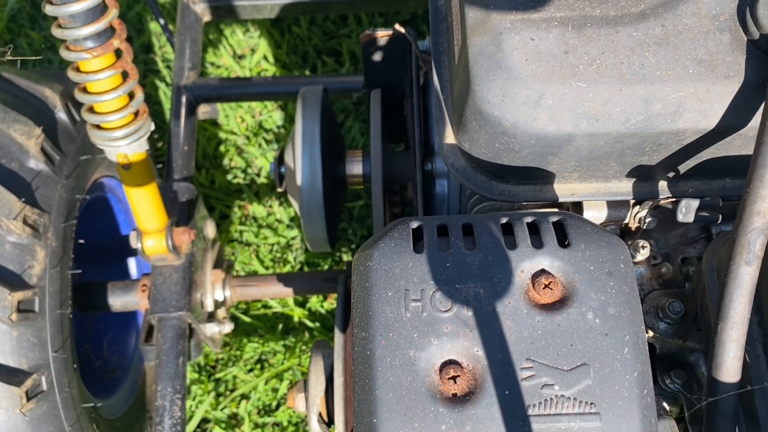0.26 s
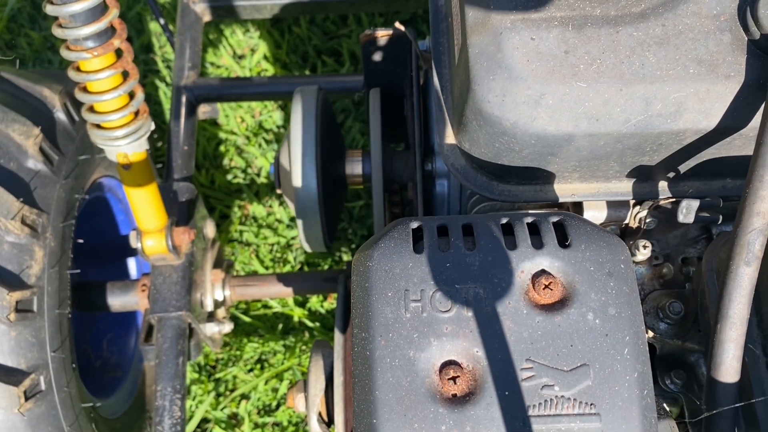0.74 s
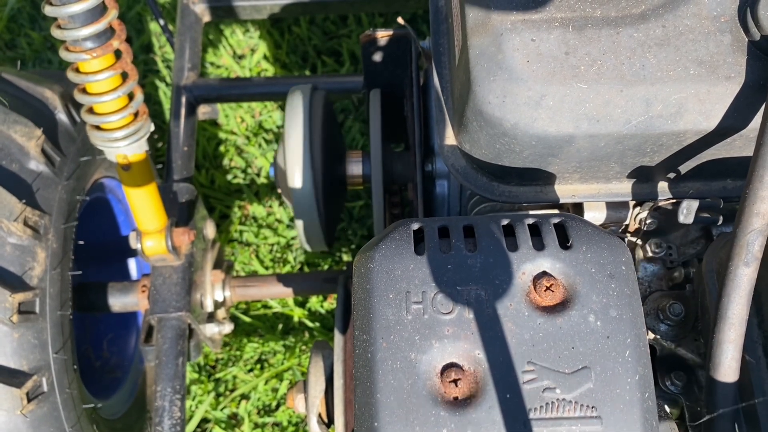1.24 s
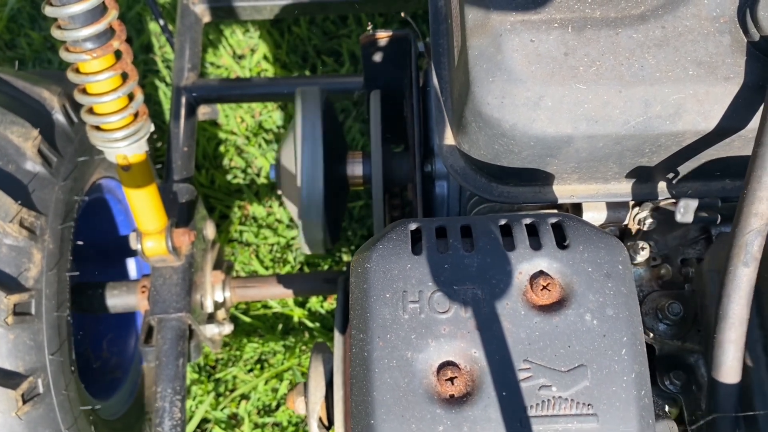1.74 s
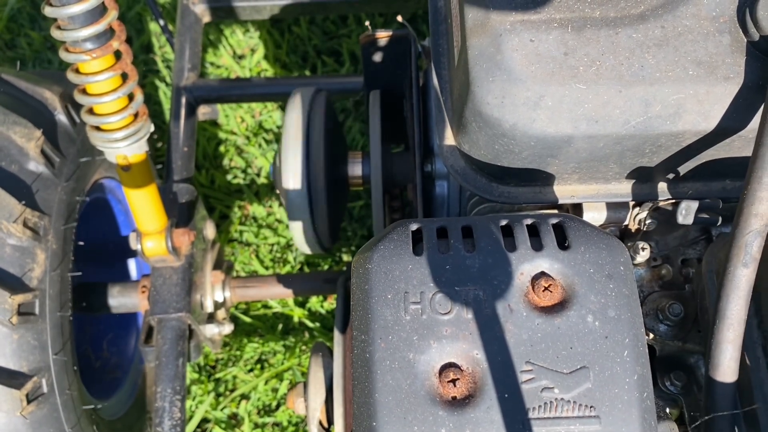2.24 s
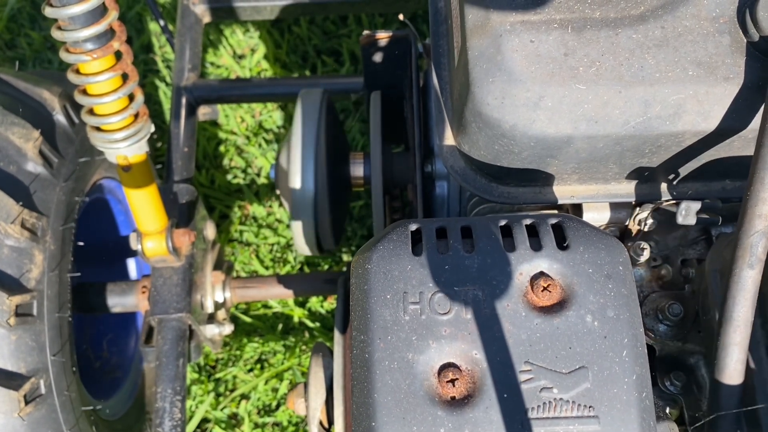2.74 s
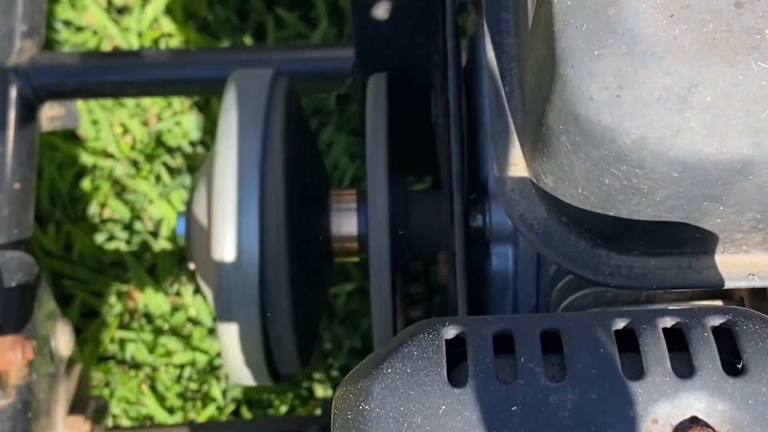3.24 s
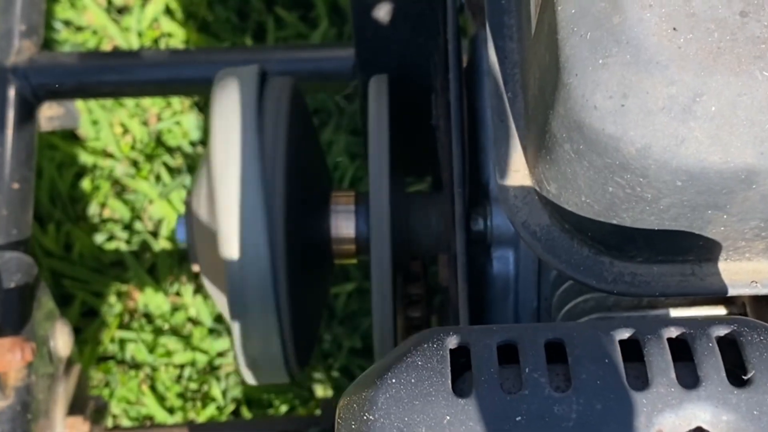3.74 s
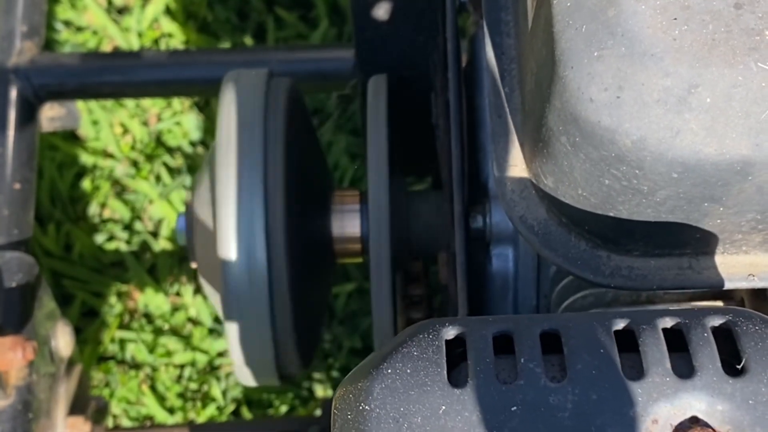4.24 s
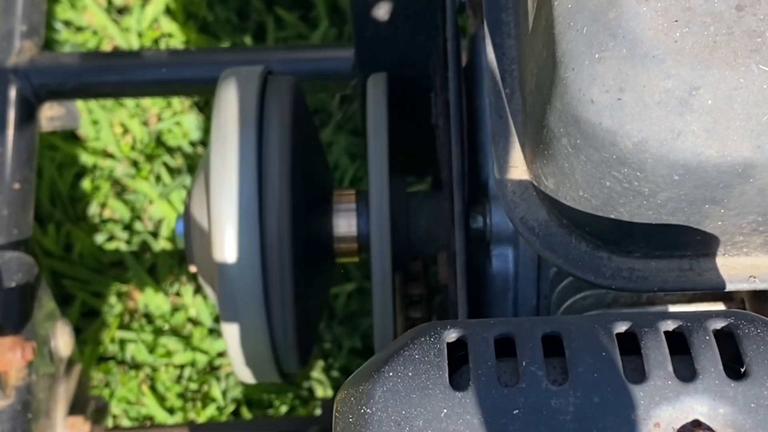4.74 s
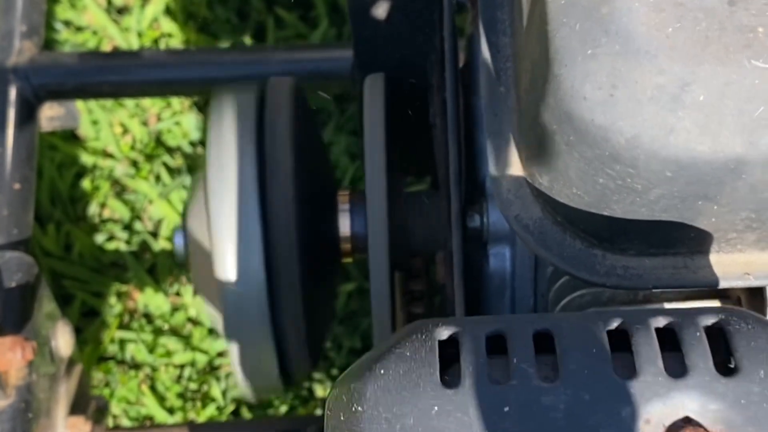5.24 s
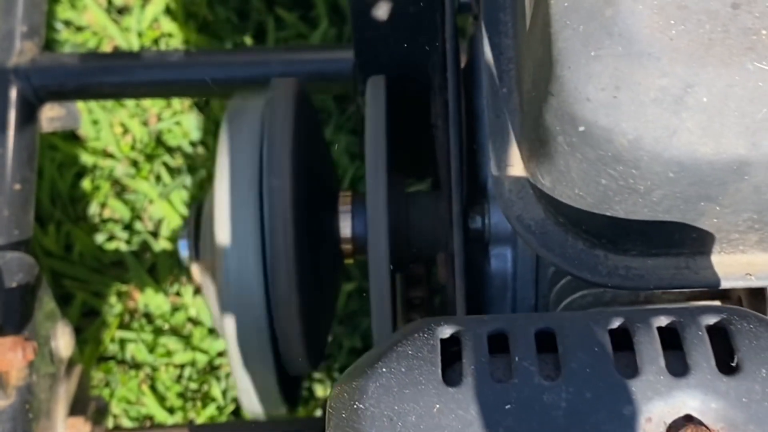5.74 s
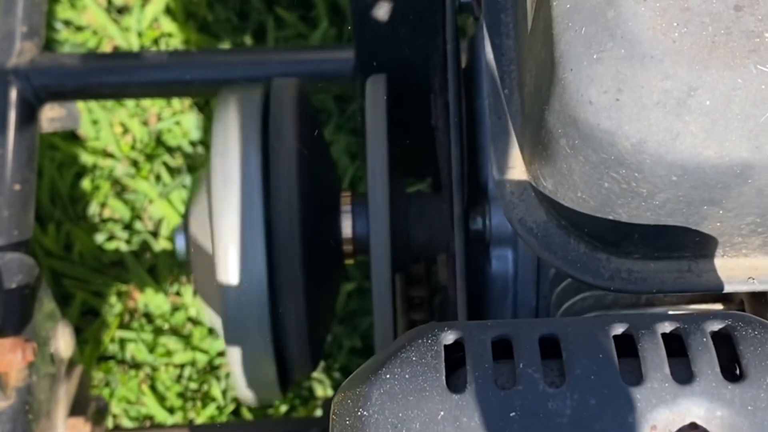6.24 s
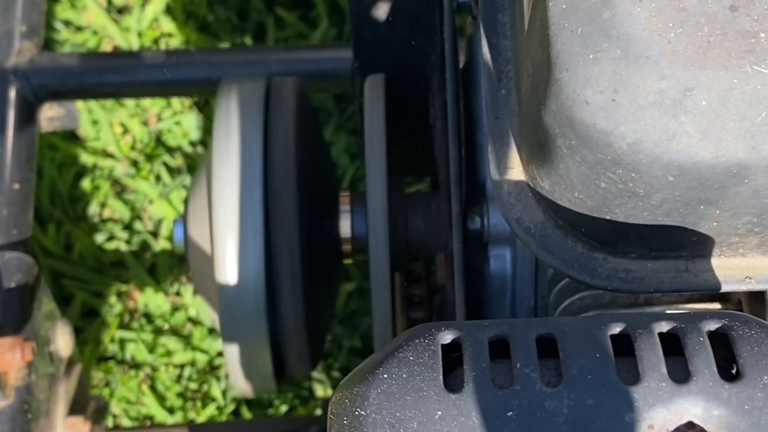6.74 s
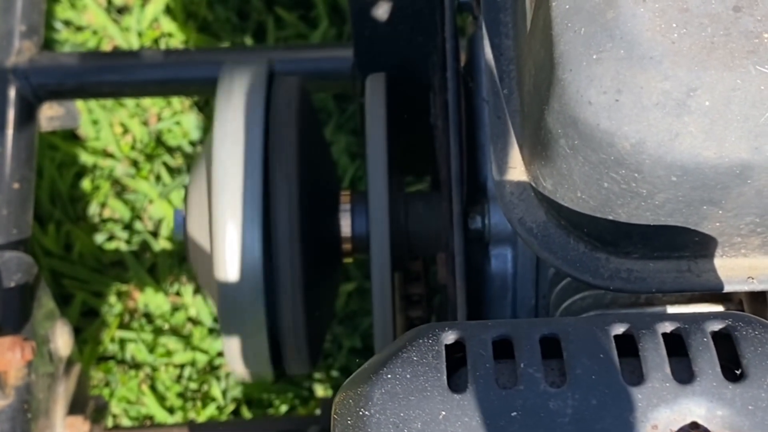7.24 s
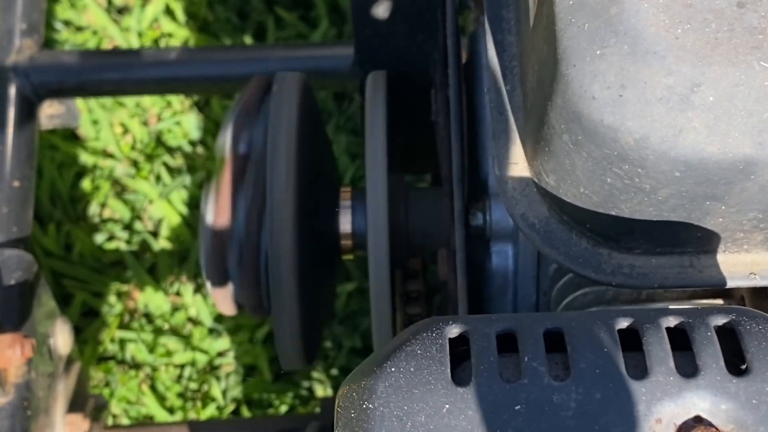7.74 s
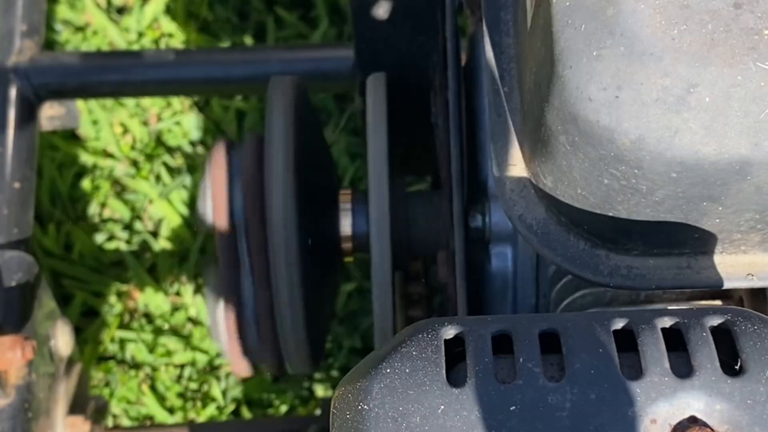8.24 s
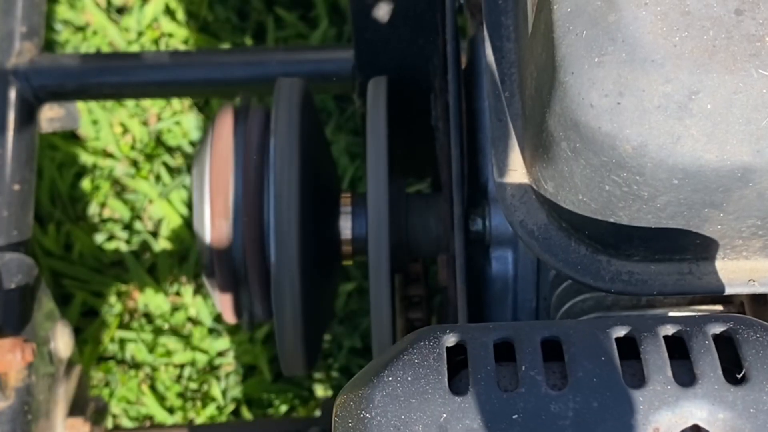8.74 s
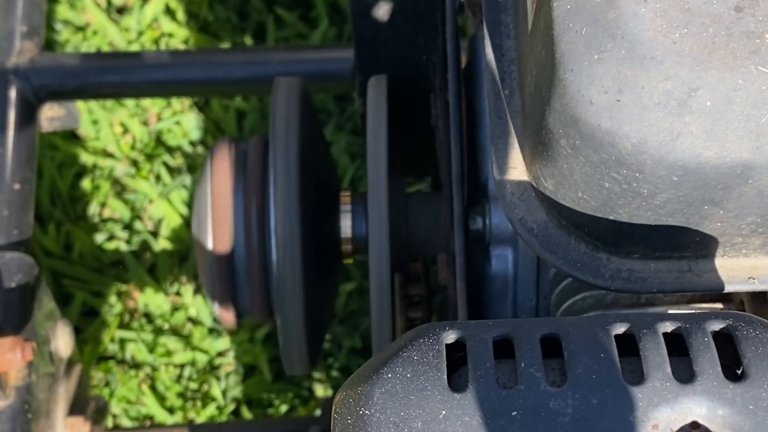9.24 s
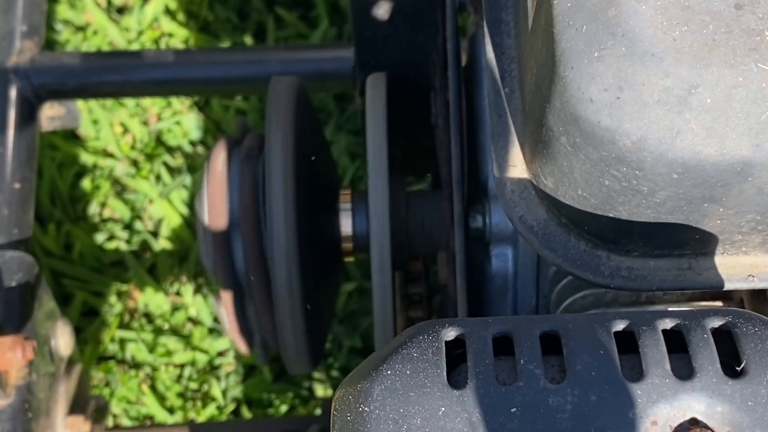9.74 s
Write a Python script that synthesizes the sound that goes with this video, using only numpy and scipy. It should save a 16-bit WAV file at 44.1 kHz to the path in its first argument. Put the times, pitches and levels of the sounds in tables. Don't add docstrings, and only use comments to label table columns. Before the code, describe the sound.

A small single-cylinder engine hunts at idle outdoors, puffing and rattling, surging in clusters of hard metallic slams from a loose clutch cup.

```python
import sys
import numpy as np
from scipy import signal
from scipy.fft import rfft, irfft, next_fast_len
from scipy.io import wavfile
from scipy.ndimage import uniform_filter1d

SR = 44100
rng = np.random.default_rng(int(sys.argv[2]) if len(sys.argv) > 2 else 0)


def invert_db(level):
    return 10 ** (np.asarray(level, dtype=float) / 20)


def wav_out(sig):
    wavfile.write(sys.argv[1], SR, np.round(np.clip(np.atleast_2d(sig).T, -1, 1) * 32767).astype(np.int16))


N = 440559

# t/s, speed/(turns/s), count/turns to next row
CRANK = [(.024, 18.7, 2), (.153, 14.2, 8), (.718, 17.9, 8), (1.176, 16.2, 4), (1.351, 25.7, 24),
         (2.523, 17.4, 4), (2.704, 25.4, 19), (3.622, 17., 4), (3.806, 24.8, 20), (4.774, 16.1, 6),
         (5.026, 29.2, 21), (5.917, 18.5, 10), (6.499, 16.06, 13), (7.35, 15.8, 4), (7.549, 24.2, 17),
         (8.393, 16.8, 8), (8.902, 14.9, 10), (9.575, 14.5, 8), (10.126, 14.5, 0)]
COAST_ABOVE_TPS, IDLE_BELOW_TPS, BREATHE_ABOVE_TPS, PULL_BELOW_TPS = 20.6, 16.4, 18.4, 24.5
SKIP_S, PUFF_LEAD_S, BURN_LEAD_S = 8.72, .012, .033

# f/Hz, level/dB
RUMBLE = [(40, -3), (100, 0), (160, -2.5), (230, -1.5), (360, -3.5), (480, -8), (900, -10.5), (1300, -88)]
# f/Hz, width/Hz, level/dB
SHIELD = [(784, 35, 1), (930, 79, 3.5), (1123, 105, 5), (1373, 550, -4), (1848, 21, 0.5), (2035, 80, -7),
          (2523, 230, -8.5)]
# f/Hz, level/dB
CLATTER = [(710, -29), (1200, -29), (1470, -3), (2010, 5.5), (2130, -12.5), (2480, -1), (4470, -5),
           (5810, -13), (6810, -10.5), (9000, -17), (11700, -55), (19800, -120)]
# f/Hz, width/Hz, level/dB
CLATTER_PEAKS = [(3970, 110, 11), (4870, 80, -58), (5960, 47, -4), (7040, 90, -31)]
# f/Hz, level/dB
FIZZ = [(6000, -9), (8000, -1.5), (9500, 4), (11000, 0.5), (13000, -1.5), (15700, -6.5), (16200, -57)]
# t/s, level/dB
SHAKE = [(0, 3), (.5, 2), (.62, 7), (.8, 0), (1.15, 4), (1.36, 1), (1.95, 0), (2.72, 3.5), (3.6, 1),
         (4.72, 2), (5.1, 3.5), (5.7, 2), (6.2, 2), (6.45, -3), (7.3, -1.5), (7.52, 3.5), (8.6, -4.5),
         (9.99, -4)]
# level at rest/dB, rise when flung/dB, share of shake/1
LAYERS = [
    (-33, 5, 1.2),
    (-32, 2.3, 0.92),
    (-38, 3, 1),
    (-49.5, 6.5, 1.08),
]
# t/s, length/s, level/dB
CHATTER = [
    (1.713, 0.22, -39.5),
    (2.994, 0.16, -36.5),
    (4.12, 0.137, -41),
]
# f/Hz, width/Hz, level/dB
WHIRL = [(1770, 30, -4), (2400, 69, -2), (3690, 39, 1.5), (4580, 96, -9), (4870, 34, -16), (5300, 94, -5.5),
         (6100, 60, -7), (6760, 75, -5), (7660, 65, -10)]
# f/Hz, width/Hz, level/dB
FRAME = [(237, 31, 0.5), (368, 55, 1), (459, 95, -2)]
WHIRL_DB, FRAME_DB = -32.5, -33
FLING_TPS, FLING_WIDTH_TPS = 20.8, 0.55
RUB_START_S, RUB_LENGTH_S, RUB_DB = 5.05, 0.75, 4

# t/s, length/s, f/Hz, width/Hz, level/dB
RINGS = [(.7, .06, 5185, 20, -27), (.7, .06, 6070, 40, -33), (.7, .06, 10600, 60, -34),
         (.7, .07, 14600, 60, -36), (.768, .02, 5060, 90, -19), (.768, .02, 10600, 150, -28),
         (.768, .02, 14600, 150, -30), (7.44, .05, 5185, 50, -25), (7.44, .17, 4960, 50, -29),
         (7.44, .27, 6060, 40, -30), (7.56, .05, 14600, 80, -34), (7.56, .07, 300, 30, -25),
         (7.56, .05, 500, 40, -27), (8.3, .04, 620, 60, -27), (7.62, .05, 3400, 30, -28),
         (7.62, .07, 5600, 50, -31), (7.62, .09, 7750, 40, -33), (7.62, .1, 7500, 40, -36)]
# t/s, level/dB
DRAG = [
    (5.95, -58),
    (6.02, -33.5),
    (6.08, -27),
    (6.24, -28.5),
    (6.3, -52),
    (6.4, -39),
]
DRAG_FIRST_S, DRAG_GAP_S, DRAG_COUNT = 5.993, .0255, 7

# t/s, shield ring level/dB, crash level/dB
BURNS = [(0.683, 6.5, -14), (0.743, 0, -21), (1.196, 6, -12.5), (1.247, -1, -15), (1.29, -5, -15.5),
         (1.33, -19, -25.5), (2.545, 2, -15.5), (2.593, 4, -17), (2.64, -3, -16), (3.644, 5.5, -15.5),
         (3.693, 5.5, -15), (3.741, 2, -16.5), (4.801, 4.5, -15), (4.847, 2, -15.5), (4.895, -1, -16),
         (4.934, -20, -16.5), (4.97, -21, -19.5), (5.028, -18, -18.5), (5.054, -4, -15.5),
         (7.382, 0, -18.5), (7.439, -16, -15), (7.481, -5, -19.5), (7.558, -6, -18.5), (7.621, -7, -23),
         (7.653, -24, -21.5)]
# t/s, crash level/dB
TAPS = [(.604, -33), (.633, -31), (.771, -30), (0.971, -24.5), (1.09, -27), (1.148, -26.5), (3.375, -38),
        (3.602, -30.5), (3.627, -35), (4.479, -35), (4.784, -25.5), (5.197, -28), (8.428, -32)]
# t/s, crash level/dB, shield ring level/dB
SLAPS = [
    (2.107, -24, -7),
    (3.474, -22.5, -3.5),
    (4.579, -22.5, -1.5),
    (6.274, -23, -33),
    (8.304, -28, -12),
]
# from t/s, to t/s, crash level/dB, shield ring level/dB
IDLE_KNOCKS = [
    (.1, .6, -27, 5),
    (8.75, 9.95, -34.5, -7),
]
# f/Hz, level/dB
CRASH = [(250, 4.5), (600, 6), (1500, -2), (3000, 0), (5000, -4.5), (7500, -7.5), (9000, -34), (10000, -60)]
# f/Hz, width/Hz, level/dB
RING = [(830, 40, -6), (945, 50, -4), (1148, 34, 0), (1380, 60, -10), (1830, 70, -10), (2410, 90, -16)]
BURN_SIZZLE_DB, TAP_SIZZLE_DB, SLAP_SIZZLE_DB, IDLE_SIZZLE_DB, TAP_RING_DB = -2, -4.5, 0.5, -2, 22
DRAG_CRASH_DB, DRAG_RING_DB, DRAG_SIZZLE_DB = 5, 20.5, -6
SWELL_S, RING_LEAD_S = .004, 0.00302
STRIKE = 12.3

# start/s, end f/Hz, sweep/Hz, sweep time/s, rise/s, length/s, size/1
INTAKE = [
    (-.0131, 84.6, 74., .0011, .021, .0211, .296),
    (.0022, 51.8, 845., .0041, .011, .0246, .148),
]
EXHAUST = [
    (-.0183, 80.8, 1036., .0031, .003, .04, .127),
    (-.0063, 124.8, 580., .0011, .0168, .0235, -.106),
]
COASTING = [
    (-.0165, 62.8, 193., .0042, .0007, .0298, .123),
    (-.012, 108.8, 390., .0012, .0024, .0149, .048),
]
# t/s, level/dB
PUFF_DB = [(0, -20), (0.72, -18.5), (0.82, -26), (1.05, -17), (1.36, -23.5), (1.85, -25), (2, -23),
           (2.6, -22.5), (3.55, -22.5), (4.85, -21), (5.15, -24), (5.7, -31.5), (6.3, -31), (7.3, -25),
           (7.6, -23.5), (7.9, -24.5), (8.4, -26), (9.99, -25.5)]
COAST_TPS, COAST_PITCH_POWER = 23, 0.65
SURGE_DB, SURGE_PITCH = 1, 1.12

# f/Hz, level/dB
SCATTER = [(50, -25), (250, -18), (500, -12), (1200, -11), (2500, -8.5), (5000, -11), (7500, -16),
           (16000, -17)]
# f/Hz, level/dB
BALANCE_DB = [(60, .8), (250, 1.5), (1000, 2.6), (2400, 3.7), (4400, 3.4), (8000, 0), (16000, 0)]
# f/Hz, phase/rad
LEAD = [(0, 0), (2000, .2), (3100, .5), (3600, .1), (6900, 0), (9050, -3.14), (11250, -6.28),
        (13150, -9.42), (15500, -12.57), (17000, -13)]
MID_DROP_DB, SIDE_DROP_DB, DROP_LUCK_DB, DROP_FROM_HZ = -6.5, -6, 2.2, 6200


def evened(x):
    return x / np.sqrt(np.mean(x ** 2) + 1e-20)


def read(points, hz):
    f, value = np.transpose(points)
    return np.interp(np.log(hz + 1), np.log(f + 1), value)


def curve(points, t, **ends):
    return np.interp(t, *np.transpose(points), **ends)


def colour(x, gain):
    size = next_fast_len(x.shape[-1])
    spectrum = rfft(x, size) * gain(np.fft.rfftfreq(size, 1 / SR))
    return irfft(spectrum, size)[..., :x.shape[-1]]


def white():
    return rng.standard_normal(N)


def noise(points):
    return evened(colour(white(), lambda hz: invert_db(read(points, hz))))


def resonate(x, modes):
    return sum((-1) ** k * invert_db(db) * signal.lfilter(*signal.iirpeak(hz, hz / width, SR), x)
               for k, (hz, width, db) in enumerate(modes))


def add(mix, s, sound):
    at = round(s * SR)
    part = mix[max(at, 0):max(at + len(sound), 0)]
    part += sound[max(-at, 0):][:len(part)]


def window(t, start, length, ramp_s):
    return np.clip(np.minimum(t - start, start + length - t) / ramp_s, 0, 1)


def crank():
    t = np.arange(N + 3000) / SR
    s, speed, count = np.transpose(CRANK)
    row = np.clip(np.searchsorted(s, t) - 1, 0, len(s) - 2)
    gain = ((count[:-1] / np.diff(s) - speed[:-1]) / np.diff(s))[row]
    u = t - s[row]
    angle = (np.cumsum(count) - count)[row] + speed[row] * u + gain * u ** 2
    return angle, speed[row] + 2 * gain * u, gain > 10


def turns():
    angle, speed, gaining = crank()
    at = np.searchsorted(angle, np.arange(int(angle[-1]) + 1) - 1e-4)
    s, speed, odd = at / SR, speed[at], np.arange(len(at)) % 2
    pulling = gaining[at - 1] & (speed < PULL_BELOW_TPS)
    slowing = np.where(odd, speed < BREATHE_ABOVE_TPS, 2)
    idling = odd == (s > SKIP_S)
    kind = np.select([pulling, speed > COAST_ABOVE_TPS, speed > IDLE_BELOW_TPS], [0, 2, slowing], idling)
    return s - PUFF_LEAD_S * (kind < 2), kind


def rattle():
    t, times = np.arange(N) / SR, turns()[0]
    angle, speed, _ = (v[:N] for v in crank())
    flung = uniform_filter1d(1 / (1 + np.exp((FLING_TPS - speed) / FLING_WIDTH_TPS)), size=1500)
    shake = curve(SHAKE, t)
    rumble, shield, clatter, fizz = (invert_db(db + more_db * flung + share * shake)
                                     for db, more_db, share in LAYERS)

    half_turns = 2 * angle + .3
    strength = rng.standard_normal(2 * len(times) + 4)[half_turns.astype(int)]
    tick = np.exp(-(half_turns % 1) / .4) * invert_db(1.6 * strength)

    def beat(depth):
        return evened(uniform_filter1d(1 - depth + depth * evened(tick), size=220))

    heave = evened(1 + (.6 - 0.37 * flung) * np.cos(2 * np.pi * (angle + 0.16)))
    bright = noise(CLATTER) + invert_db(-6.5) * resonate(white(), CLATTER_PEAKS)
    body = evened(resonate(white(), SHIELD))
    chatter = sum(invert_db(db) * window(t, s, length, 0.02) for s, length, db in CHATTER)
    rub = invert_db(RUB_DB * window(t, RUB_START_S, RUB_LENGTH_S, 0.014))
    clatter, fizz = rub * clatter, rub * fizz + chatter * tick ** 2

    whirl = invert_db(WHIRL_DB + shake - 4.5) * rub ** 1.3 * beat(0.58) * evened(resonate(white(), WHIRL))
    jolts = np.diff(np.floor(angle + .6), prepend=0) * invert_db(1.7 * strength)
    frame = invert_db(FRAME_DB + shake) * evened(resonate(jolts, FRAME))

    out = flung * (whirl + frame)
    out += invert_db(2.5) * rumble * heave * noise(RUMBLE)
    out += invert_db(-1.0) * shield * beat(0.063) * body
    out += invert_db(2.5) * clatter * beat(0.53 / rub) * evened(bright)
    return out + invert_db(7) * fizz * beat(0.76 / rub) * noise(FIZZ)


def cup():
    out, t = np.zeros(N), np.arange(16000) / SR
    for s, length, hz, width, db in RINGS:
        scrape = rng.standard_normal(len(t)) * np.clip(1.3 - t / length, 0, 1)
        song = resonate(scrape, [(hz, width, 0)])
        add(out, s, invert_db(db) * song / np.std(song[t < length]))
    drag = invert_db(curve(DRAG, np.arange(N) / SR, left=-120, right=-120))
    groan = resonate(white(), [(826, 16, 5), (700, 25, -9), (974, 25, -7), (1820, 50, -10)])
    return out + drag * evened(groan)


def blows():
    times, kinds = turns()
    rows = [(s, ring, db, db + BURN_SIZZLE_DB) for s, ring, db in BURNS]
    rows += [(s, db + TAP_RING_DB, db, db + TAP_SIZZLE_DB) for s, db in TAPS]
    rows += [(s, ring, db, db + SLAP_SIZZLE_DB) for s, db, ring in SLAPS]

    burns = times[kinds == 1] + PUFF_LEAD_S - BURN_LEAD_S
    luck = 1.15 * rng.standard_normal((len(burns), 2))
    for first, last, db, ring in IDLE_KNOCKS:
        rows += [(s, ring + 0.5 * a, db + b, db + b + IDLE_SIZZLE_DB)
                 for s, (a, b) in zip(burns, luck) if first < s < last]

    drags = DRAG_FIRST_S + DRAG_GAP_S * np.arange(DRAG_COUNT)
    rows += [(s, db + DRAG_RING_DB, db + DRAG_CRASH_DB, db + DRAG_SIZZLE_DB)
             for s, db in zip(drags, curve(DRAG, drags + 0.014))]
    return rows


def blow(u, rise_s, t60_s):
    return (u > 0) * (1 - np.exp(-abs(u) / rise_s)) * invert_db(-60 * abs(u) / t60_s)


def knocks():
    ring, crash, sizzle, pop = np.zeros((4, N))
    t = np.arange(3000) / SR
    low_pop = blow(t, 0.00082, 0.0098) * np.sin(2 * np.pi * 310 * t)
    for s, ring_db, crash_db, sizzle_db in blows():
        hard = np.clip((crash_db + 24.5) / 8, 0, 1)
        shape = (1.6 - 1.12 * hard) * blow(t, .002, 0.053) + 2.29 * hard * blow(t - .002, 0.011, 0.068)
        rebound = (0.31 + 0.27 * hard) * blow(t - .009, 0.015, 0.19)
        add(ring, s - RING_LEAD_S, invert_db(ring_db - 16.5) * (1.22 * blow(t, 0.0002, 0.064) + rebound))
        add(crash, s, invert_db(crash_db + 5) * shape)
        add(sizzle, s, invert_db(sizzle_db + 4) * shape)
        add(pop, s - .014, invert_db(3.5) * hard ** 3 * low_pop)
    crash, sizzle = uniform_filter1d([crash, sizzle], size=round(SWELL_S * SR))

    grit = invert_db(3. * evened(uniform_filter1d(white(), size=90)) - .5)
    shudder = ring * white()
    strike = STRIKE * np.maximum(np.diff(ring, prepend=0), 0)
    ring = evened(resonate(shudder + strike, RING)) * np.std(ring)
    metal = evened(noise(CRASH) + invert_db(-10.0) * evened(resonate(white(), WHIRL + FRAME)))
    return ring + grit * (crash * metal + sizzle * noise(FIZZ)) + pop


def puffs():
    out, t = np.zeros(N), np.arange(-1200, 1800) / SR
    times, kinds = turns()
    speed, gaining = (v[(times * SR).astype(int)] for v in crank()[1:])
    levels = curve(PUFF_DB, times) + SURGE_DB * gaining
    surge_pitch = np.where(gaining, SURGE_PITCH, 1)
    pitches = np.where(kinds == 2, (speed / COAST_TPS) ** COAST_PITCH_POWER, surge_pitch)
    lucks = rng.standard_normal((len(times), 2))
    for s, db, kind, pitch, luck in zip(times, levels, kinds.astype(int), pitches, lucks):
        puff = np.zeros(len(t))
        sweeps = [INTAKE, EXHAUST, COASTING][kind]
        for (start, hz, sweep_hz, fall, rise, length, size), r in zip(sweeps, luck):
            u = np.maximum(pitch * t - start, 0)
            cycles = hz * u + (1 + .04 * r) * sweep_hz * fall * (1 - np.exp(-u / fall))
            envelope = (1 - np.exp(-u / rise)) * np.exp(-(u / length) ** 4)
            puff += size * np.sin(2 * np.pi * cycles) * envelope
        add(out, s + t[0], invert_db(db + [.3, 1.2, -1.2][kind] + .5 * luck[0]) * evened(puff))
    return out


def scene():
    near = rattle() + cup() + knocks() + puffs()
    taps = rng.standard_normal((3, 2000)) * invert_db(-60 * np.arange(2000) / SR / .06)
    taps = taps / np.linalg.norm(taps[0])
    phase = np.arange(N) / SR * 3.1 + np.arange(3)[:, None] / 3
    turn = np.sqrt(2 / 3) * np.cos(2 * np.pi * phase)
    echoes = (turn * signal.fftconvolve(near[None], taps, axes=1)[:, :N]).sum(0)
    return near + np.array([[1], [-1]]) * colour(echoes, lambda hz: invert_db(read(SCATTER, hz)))


def thin(x):
    hz, _, z = signal.stft([x[0] + x[1], x[0] - x[1]], SR, nperseg=1024)
    power = np.add.reduceat(abs(z) ** 2, np.arange(0, 513, 16), axis=1)
    power = np.repeat(uniform_filter1d(power, size=3, axis=2), 16, axis=1)[:, :513]
    luck = evened(uniform_filter1d(rng.standard_normal((33, z.shape[2])), size=5))
    luck_db = DROP_LUCK_DB * np.repeat(luck, 16, axis=0)[:513]
    limit_db = np.array([[[MID_DROP_DB]], [[SIDE_DROP_DB]]]) + luck_db
    weak = power < power[::-1] * invert_db(limit_db) ** 2
    kept = z * ~(weak & (hz > DROP_FROM_HZ)[:, None])
    mid, side = signal.istft(kept, SR, nperseg=1024)[1][:, :N] / 2
    return np.array([mid + side, mid - side])


def top_cut(x):
    return signal.sosfilt(signal.butter(12, 16850, fs=SR, output="sos"), x)


def record(dry):
    side = np.array([[.5], [-.5]])
    bass_cut = signal.sosfilt(signal.butter(3, 40, "high", fs=SR, output="sos"), dry)

    def port_gain(hz):
        level_db = side * read(BALANCE_DB, hz) - 40 * (hz > 15900)
        return invert_db(level_db) * np.exp(1j * side * curve(LEAD, hz))

    ports = colour(1.079 * np.tanh(bass_cut / 1.143), port_gain)
    mix = np.clip(thin(ports), -1, 1)
    return top_cut(mix)


dry = scene()
out = record(dry)
wav_out(out)
```